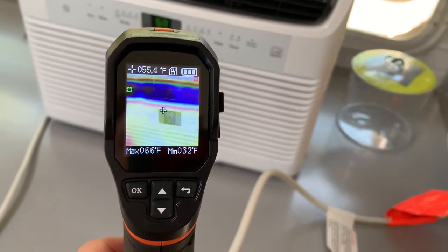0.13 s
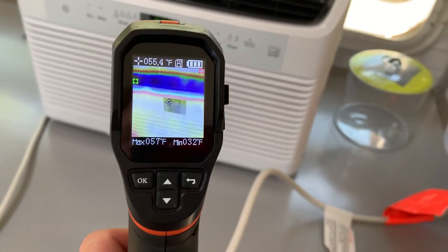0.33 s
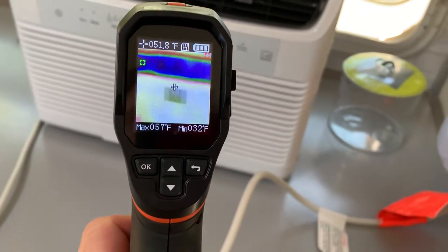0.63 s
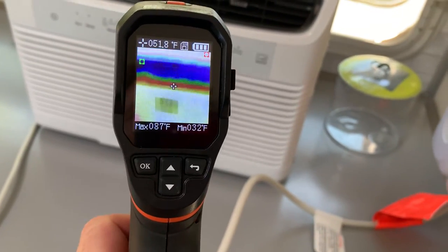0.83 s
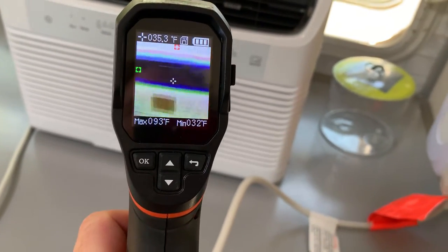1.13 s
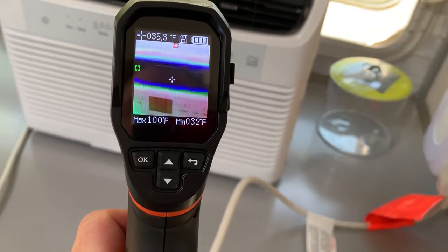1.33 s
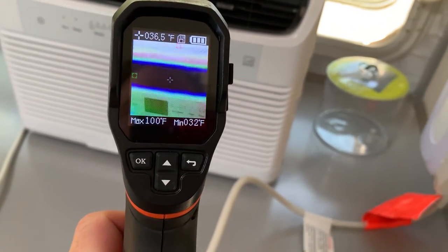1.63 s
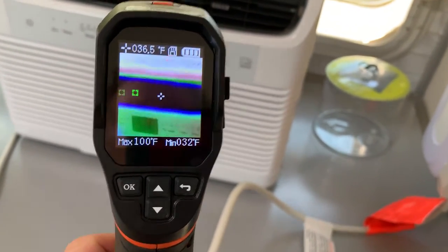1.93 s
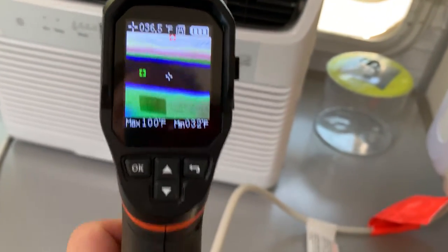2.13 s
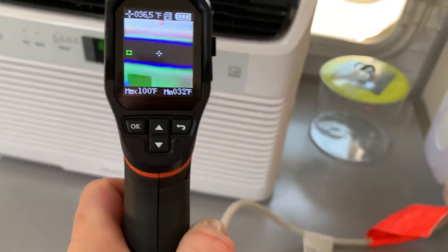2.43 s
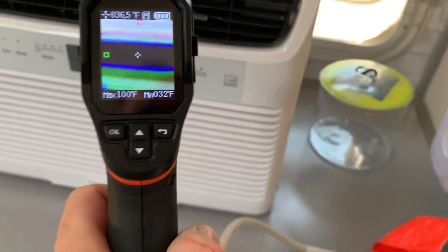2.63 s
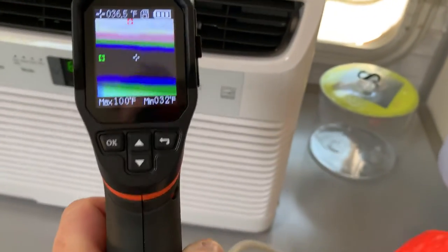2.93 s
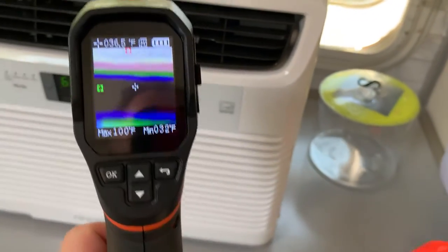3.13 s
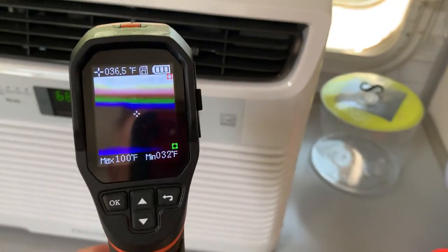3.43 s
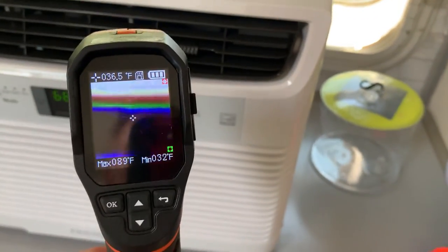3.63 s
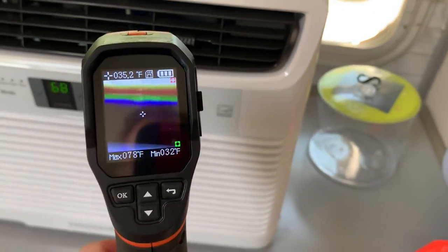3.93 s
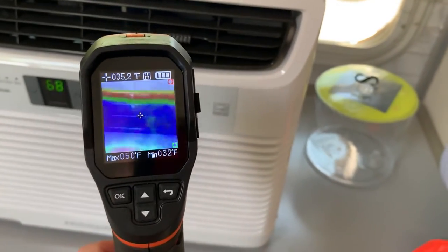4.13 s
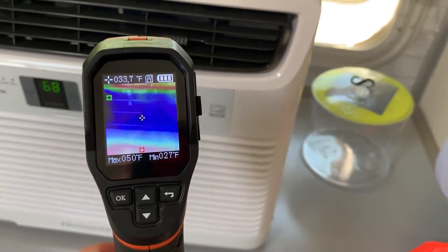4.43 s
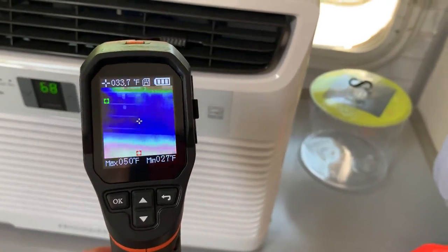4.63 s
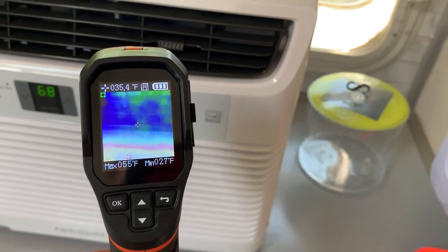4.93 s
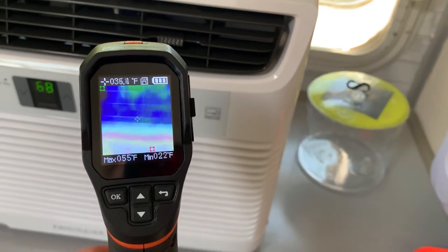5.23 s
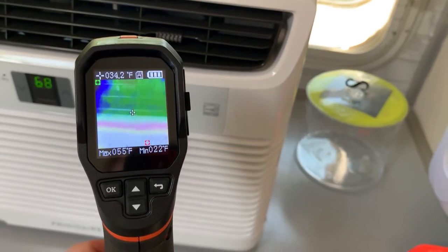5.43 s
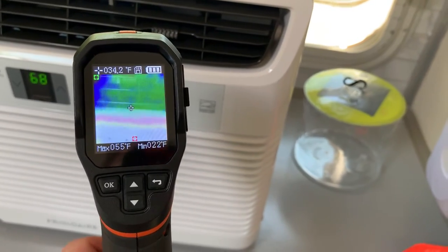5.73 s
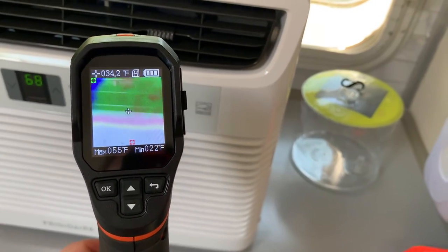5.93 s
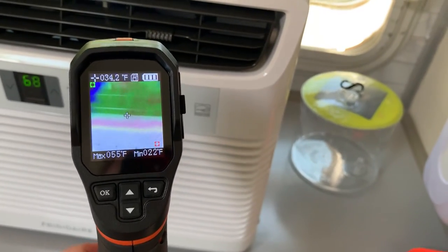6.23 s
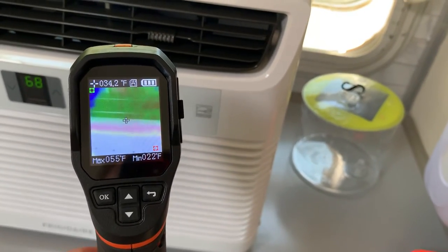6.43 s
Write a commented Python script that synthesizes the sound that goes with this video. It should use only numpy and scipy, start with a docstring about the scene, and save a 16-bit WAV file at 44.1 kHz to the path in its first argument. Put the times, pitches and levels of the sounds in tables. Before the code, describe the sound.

Close to a running air conditioner: low buzzing hum and fan drone under an even rush of air, the tone shifting slightly midway.

```python
"""A window air conditioner runs in a small camper, close to a hand-held camera with two microphone ports.
The compressor hums on many multiples of its shaft speed (sines and a repeated buzz), the fan blades drone
(wavering sines) and air rushes through the louvres (shaped noise); the bass dips slightly until 1.8 s.
From 2.3 to 3.2 s the camera swings, and the standing waves reach the ports differently.
The bass swells until 5 s and then holds; the hiss grows until about 5 s, then eases a little."""
import sys
import numpy as np
from scipy import signal
from scipy.fft import rfft, irfft, next_fast_len
from scipy.io import wavfile
from scipy.ndimage import uniform_filter1d, map_coordinates

SR = 44100
rng = np.random.default_rng(int(sys.argv[2]) if len(sys.argv) > 2 else 0)


def unload_audio(sound):
    """Save the sound as a 16-bit wav file, at the path given as the first command line argument."""
    columns = np.transpose(np.atleast_2d(sound))
    # keep every value between -1 and 1, then stretch to whole-number steps
    steps = np.round(np.clip(columns, -1, 1) * 32767)
    wavfile.write(sys.argv[1], SR, steps.astype(np.int16))


def boost(x):
    """Linear amplitude factor 10**(x/20) for a level x in decibels (scalar or array-like)."""
    u = np.asarray(x, float) / 20
    return 10 ** u


N = 290178  # samples
SHAFT_HZ = 58.02  # compressor turns a second

# Strong compressor tones, before creep and tremor: (multiple of the shaft speed, then rms level [dB] of
# first place in step, first place opposed, second place in step, second place opposed)
SHAFT_TONES = [(1, -32, -49, -31, -48), (2, -49.5, -66, -46, -62), (3, -57, -70, -61, -77),
               (4, -51, -70, -48, -67), (5, -43, -65, -42, -60), (6, -56, -69, -59, -77),
               (7, -60, -71, -66, -73), (13, -60, -70, -63, -75), (14, -62, -61, -69, -62),
               (15, -61, -61, -53, -75), (16, -52, -54, -57, -56), (17, -64, -52, -56, -52),
               (18, -53, -57, -54, -58), (19, -60, -52, -59, -58), (20, -62, -50, -54, -50),
               (21, -53.5, -65, -54, -65), (22, -41.5, -58, -54.5, -48), (23, -54.5, -64, -59, -49),
               (24, -63, -65, -77, -57), (25, -62, -57, -63, -55), (26, -70, -57, -56, -66),
               (27, -56, -61, -57, -51), (28, -67, -58, -52.5, -53), (30, -58.5, -72, -65, -76),
               (31, -64, -74, -65, -65), (36, -70, -66, -67, -74), (37, -67, -67, -66, -76),
               (40, -76, -72, -65, -80), (44, -80, -90, -71, -78), (41, -64, -66, -57, -64),
               (54, -68, -63, -70, -76), (57, -59, -68, -66, -66), (61, -72, -66, -72, -71),
               (86, -72, -79, -85, -85), (148, -90, -76, -90, -69), (179, -70, -90, -74, -90),
               (227, -90, -73, -90, -66), (228, -90, -76, -90, -67)]
# How alike the two ports hear a sound: (frequency [Hz], likeness [0-1])
PORT_LIKENESS = [(60, .99), (380, .95), (520, .3), (650, .3), (800, .7), (1000, .65), (1300, .2),
                 (3000, .3), (4500, .15), (6500, .4), (7600, .86), (16000, .9)]
# Left port over right port for noise of the air: (frequency [Hz], level [dB])
PORT_TILT = [(60, 5), (110, -3.5), (200, 0), (380, 0), (700, -2), (1290, 1), (2380, -0.5), (4400, -4),
             (8120, 0), (15000, -0.5)]


def along(points, hz):
    """Reads a value between (frequency [Hz], value) points on a log frequency axis."""
    f, v = np.transpose(points)
    return np.interp(np.log(hz + 1), np.log(f + 1), v)


def wobble(rate):
    """A smooth random curve through `rate` random points a second."""
    at = np.arange(0, N + 128, 128)
    points = rng.standard_normal(int(N * rate / SR) + 4)
    return np.interp(np.arange(N), at, map_coordinates(points, [at * rate / SR]))


def patch_field(shape, bins, frames):
    """Random gain patches over frequency and time, with a spread of one."""
    field = uniform_filter1d(rng.standard_normal(shape), size=bins, axis=0)
    field = uniform_filter1d(field, size=frames, axis=1)
    return field / field.std()


def patched(x, patchy_db, bins, frames):
    """Gives x random gain patches, as a trembling hand moves through short standing waves."""
    z = signal.stft(x, nperseg=1024)[2]
    z = z * boost(patchy_db * patch_field(z.shape[1:], bins, frames))
    return signal.istft(z, nperseg=1024)[1][:, :N]


def hand():
    """The hand's motion: place (0 first, 1 second), arrival clock [s], bass and hiss gains [dB]."""
    # The hand drifts toward the machine and back: (time [s], distance [m])
    hand_distance = [(0, 0.86), (1.3, 0.79), (2, .75), (3, 0.72), (4.6, .69), (5.1, 0.68), (6.58, 0.79)]
    # The cabin's bass swells as the camera nears the wall: (time [s], level [dB])
    bass_swell = [(0, -0.4), (1.8, -0.74), (3.2, 0), (5, 0.47), (6.58, 0.43)]
    swing_start_s, swing_end_s = 2.33, 3.22
    hiss_first_db, hiss_second_db = -0.5, 0.55  # at the two places
    sound_m_per_s = 343
    t = np.arange(N) / SR
    metres = np.interp(t, *np.transpose(hand_distance))
    metres = uniform_filter1d(metres, size=SR // 3, mode="nearest")
    near_db = 20 * np.log10(metres[0] / metres)
    swing = np.clip((t - swing_start_s) / (swing_end_s - swing_start_s), 0, 1)
    place = np.sin(swing * np.pi / 2) ** 2
    clock = t - metres / sound_m_per_s
    bass_db = np.interp(t, *np.transpose(bass_swell))
    # the hiss grows less than 1 / distance would make it
    hiss_db = hiss_first_db + (hiss_second_db - hiss_first_db) * place + 0.31 * near_db
    return place, clock, bass_db, hiss_db


def crossing_lead(hz):
    """Radians by which the left port leads for sound that crosses from one port to the other."""
    lag_samples, in_step_hz = 8.95, 10940
    return 2 * np.pi * (hz - in_step_hz) * lag_samples / SR


def low_air_lead(hz):
    """Radians by which the left port leads for the boom and the duct."""
    # Lead of the left port: (frequency [Hz], lead [radians])
    left_lead = [(60, 0.49), (400, -0.24), (600, -2.2), (900, 1), (1200, -2.5)]
    return along(left_lead, hz)


def shaft_wave():
    """A cosine that runs once for each compressor stroke."""
    return np.cos(2 * np.pi * SHAFT_HZ * np.arange(N) / SR)


def air(spectrum, lead, patchy_db):
    """Moving air: stereo noise at the given density, partly alike at both ports, with patches of random gain."""
    z = signal.stft(rng.standard_normal((2, N + 512)), nperseg=512)[2]
    gain = boost(patchy_db * patch_field(z.shape[1:], bins=5, frames=10))
    pair = signal.istft(z * gain, nperseg=512)[1]
    m = next_fast_len(N + 8192)
    hz = np.fft.rfftfreq(m, 1 / SR)
    density = boost(along(spectrum, hz)) * (hz < spectrum[-1][0]) * np.sqrt(SR / 2)
    a, b = rfft(pair, m) * density
    # this angle blends two noises so that the ports are as alike as the table says
    turn = np.arccos(np.clip(along(PORT_LIKENESS, hz), 0, 1)) / 2
    half = np.exp(.5j * lead(hz)) * boost(along(PORT_TILT, hz) / 2)
    left = (np.cos(turn) * a + np.sin(turn) * b) * half
    right = (np.cos(turn) * a - np.sin(turn) * b) / half
    return irfft(np.array([left, right]), m)[:, :N]


def windings():
    """The motor windings give a faint steady hum at twice the mains frequency."""
    return np.sqrt(2) * boost(-53) * np.sin(2 * np.pi * 120 * np.arange(N) / SR)


def boom(bass_db):
    """Air in the housing and the cabin makes a low boom that follows the bass swell."""
    # Boom before the bass swell: (frequency [Hz], density [dB per Hz])
    boom_spectrum = [(25, -88), (34, -80), (42, -75), (55, -60), (70, -54), (100, -61.5), (200, -61),
                     (260, -62), (340, -59.5), (410, -72), (480, -82.5), (700, -89)]
    return boost(bass_db) * air(boom_spectrum, low_air_lead, patchy_db=0.68)


def duct(place, bass_db):
    """Turbulence keeps the air columns in the duct sounding: narrow humps of noise."""
    # Air columns, at the second place before the bass swell:
    # (centre [Hz], width at a quarter of the power [Hz], peak density [dB per Hz])
    air_columns = [(620, 15, -80), (750, 30, -72), (887.5, 32, -67), (1057, 29, -65.5), (1840, 34, -76.5)]
    hz = np.arange(400, 2200, 4.)
    power = sum(boost(2 * db) / (1 + (2 * (hz - centre_hz) / width_hz) ** 2) ** 2
                for centre_hz, width_hz, db in air_columns)
    humps = list(zip(hz, 10 * np.log10(power)))
    return boost(bass_db - 2.5 * (1 - place)) * air(humps, low_air_lead, patchy_db=2)


def hiss(hiss_db):
    """Air and gas hiss finely, pulsing at the stroke rate and at twice that rate."""
    # Hiss before its pulses and gain: (frequency [Hz], density [dB per Hz])
    hiss_spectrum = [(3000, -100), (4500, -98), (6000, -92), (7500, -91), (7850, -90), (8600, -96.5),
                     (9200, -95.5), (10100, -88.5), (11000, -93), (12000, -90), (13100, -93), (13700, -89),
                     (14500, -88.5), (16000, -92)]
    stroke = shaft_wave()
    pulse_db = 0.72 * stroke + .5 * (2 * stroke ** 2 - 3.5)  # the square runs at twice the rate
    return boost(hiss_db + pulse_db + 0.52 * wobble(12)) * air(hiss_spectrum, crossing_lead, patchy_db=1.56)


def louvres(place):
    """Air rushes lumpily through the louvres; the cabin walls colour it differently at the two places."""
    # Rush before its faint stroke pulse, random sway and patches: (frequency [Hz], then density [dB per Hz] of
    # first place in step, first place opposed, second place in step, second place opposed)
    rush_spectrum = [(297, -75, -88, -79, -85.0), (410, -67, -82, -72, -83),
                     (470.0, -76.5, -86, -73.5, -79), (565, -73, -77.0, -71.5, -74.5),
                     (653, -77, -76, -75.5, -76.0), (770, -72.0, -77, -71.5, -78),
                     (970, -74.5, -77.0, -75, -74.5), (1110, -78, -75, -78, -77.0),
                     (1180, -76.5, -78.0, -73, -80), (1390, -76, -82.0, -81, -73),
                     (1520, -79.5, -80, -78.5, -76.0), (1630, -77.5, -79.0, -75, -77.0),
                     (1630, -81.0, -79, -81.5, -74), (1780, -81, -81, -80, -77),
                     (2010, -85.5, -81, -85, -84.0), (2110, -80.5, -81.0, -82.5, -85),
                     (2300, -87.5, -86.0, -82.5, -87.0), (2410, -85.5, -86.0, -83.0, -83.0),
                     (2510, -89.0, -88, -88, -82.0), (2720, -91.5, -84, -87.5, -84.0),
                     (3100, -85.5, -88, -85, -86), (3400, -86.5, -88.0, -87.5, -88),
                     (3420.0, -90.5, -86, -86.5, -87.0), (3670, -88.0, -91, -86.5, -89.0),
                     (3810, -89.0, -98, -87.5, -97), (4270, -93, -90, -90.5, -89),
                     (6000.0, -102.0, -102.0, -102.0, -102.0)]
    pair = patched(rng.standard_normal((2, N + 1024)), patchy_db=1.92, bins=5, frames=5)
    m = next_fast_len(N + 8192)
    hz = np.fft.rfftfreq(m, 1 / SR)
    a, b = rfft(pair, m) * (hz < rush_spectrum[-1][0]) * np.sqrt(SR / 2)
    tied = np.clip(along(PORT_LIKENESS, hz), 0, 1)
    # the tied share of the opposed part runs a quarter cycle apart
    across = 1j * tied * a + np.sqrt(1 - tied ** 2) * b
    points, *columns = np.transpose(rush_spectrum)
    gains = [boost(along(np.transpose([points, db]), hz)) for db in columns]
    tilt = boost(along(PORT_TILT, hz) / 2)
    places = []
    for in_step, opposed in (gains[:2], gains[2:]):
        left = (in_step * a + opposed * across) * tilt
        right = (in_step * a - opposed * across) / tilt
        places.append(irfft(np.array([left, right]), m)[:, :N])
    first, second = places
    pulse_and_sway = boost(0.1 * shaft_wave() + 0.24 * wobble(2.97))
    return pulse_and_sway * ((1 - place) * first + place * second)


def fan(bass_db):
    """The fan blades drone as they pass; the tone wavers in level with the turbulent inflow."""
    # Blade tones before swell and waver: (multiple of the blade rate, rms level [dB], waver [dB])
    blade_tones = [(1, -30.5, 0.7), (2, -44.5, -0.5)]
    blade_hz = 82.575  # blades passing a second
    t, out = np.arange(N) / SR, np.zeros((2, N))
    for k, db, waver_db in blade_tones:
        phase = 2 * np.pi * k * blade_hz * t + k * 0.069 * wobble(3.9)
        ports = np.sin(phase + np.array([[-.11], [.11]])) * boost(np.array([[.4], [-.4]]))
        level_db = db + 3.4 * bass_db + waver_db * wobble(7.7)  # swells more than the boom
        out += np.sqrt(2) * boost(level_db) * ports
    return out


def buzz(place, clock):
    """The casing buzzes: one stroke repeats, each multiple having a chance strength at each place."""
    # Weak comb of shaft multiples before chance scatter: (frequency [Hz], rms level of one line [dB])
    buzz_lines = [(300, -75), (760, -72), (1800, -72), (2400, -74), (3300, -73), (4100, -77), (4600, -85),
                  (5200, -83), (7300, -79), (8000, -85), (8600, -77), (9200, -83), (10100, -76),
                  (11000, -82), (13200, -77), (13800, -84), (15700, -81)]
    k, size = np.arange(300), 2 ** 14
    hz = k * SHAFT_HZ
    strong = np.isin(k, np.round([row[0] for row in SHAFT_TONES]))
    free = (k > 5) & (hz < buzz_lines[-1][0]) & ~strong
    scatter_db = 2.5 * rng.standard_normal((2, 1, len(k)))
    lines = free * boost(along(buzz_lines, hz) + scatter_db)
    phase = 1.26 * rng.standard_normal((2, 1, len(k))) + np.multiply.outer([.5, -.5], crossing_lead(hz))
    # less alike ports get more random phase
    spread = np.sqrt(-np.log(np.clip(along(PORT_LIKENESS, hz), .01, 1)))
    phase += spread * rng.standard_normal((2, 2, len(k)))
    stroke = irfft(lines * np.exp(1j * phase), size) * size / np.sqrt(2)
    at = (clock * SHAFT_HZ % 1) * size  # where in the stroke each moment falls
    first, second = [[np.interp(at, np.arange(size), port, period=size) for port in spot] for spot in stroke]
    both = np.sqrt(1 - place) * first + np.sqrt(place) * second
    return patched(both, patchy_db=3, bins=3, frames=40)


def compressor(place, clock):
    """The shaft hums in sines, each with a part in step at both ports and a part opposed, a quarter cycle apart."""
    # Multiples that change early (below 0) or late in the swing, as the ports leave or enter a crest:
    # multiple: delay [s]
    crest_delay = {16: .2, 20: .2, 22: -.03, 23: .05, 27: -.45, 28: -.4, 30: -.2, 41: -.48, 57: -.12}
    # Multiples that creep as the hand drifts: multiple: (first place [dB a second], second [dB a second])
    level_creep = {22: (-.2, 2), 23: (4, -1.2), 24: (2, 0), 26: (0, 1.3), 27: (0, -1.5), 28: (0, -.5),
                   41: (2.5, 1.4), 57: (-1, -.5)}
    # Multiples whose part in step passes through silence during the swing
    through_a_node = (21, 27, 30, 41, 57)
    turns, out, t = 2 * np.pi * SHAFT_HZ * clock, np.zeros((2, N)), np.arange(N) / SR
    for k, *db in SHAFT_TONES:
        step_first, opposed_first, step_second, opposed_second = boost(np.array(db))
        early, late = level_creep.get(k, (0, 0))
        step_first = step_first * boost(early * (np.minimum(t, 2.4) - 1.1))
        step_second = step_second * boost(late * (np.maximum(t, 3) - 4.8))
        step_second *= -1 if k in through_a_node else 1
        here = np.interp(t - crest_delay.get(k, 0), t, place)
        in_step = step_first + (step_second - step_first) * here
        opposed = opposed_first + (opposed_second - opposed_first) * here
        # nearly aligned tones throb once a stroke
        phase = k * turns + .25 * rng.standard_normal() + .005 * k * wobble(4)
        way = -1 if k < 8 else rng.choice([-1, 1])  # which port leads
        mid = in_step * np.sin(phase)
        side = way * opposed * np.cos(phase)
        if k > 1:
            # a standing wave is steady at its crest and shifts with every tremor of the hand away from it
            below_crest_db = max(db) - 20 * np.log10(abs(in_step) + 1e-5)
            tremor_db = np.clip((.5 if k == 22 else 1.1) + .2 * below_crest_db, 0, 2.5)
            mid = mid * boost(tremor_db * wobble(5))
            side = side * boost(1.2 * wobble(2))
        out += np.sqrt(2) * np.array([mid + side, mid - side]) * boost(np.array([[.4], [-.4]]))
    return out


def scene():
    """All parts of the machine, added up at the two ports."""
    place, clock, bass_db, hiss_db = hand()
    airflow = boom(bass_db) + duct(place, bass_db) + hiss(hiss_db) + louvres(place)
    return windings() + airflow + fan(bass_db) + buzz(place, clock) + compressor(place, clock)


def weaker_dropped(stereo, margins_db):
    """In each treble band and frame, mutes the ports' sum or difference when it is clearly the weaker."""
    z = signal.stft(np.array([stereo[0] + stereo[1], stereo[0] - stereo[1]]) / 2, nperseg=2048)[2]
    low, high, width = 352, 736, 32  # bins of 21.5 Hz
    power = (abs(z[:, low:high]) ** 2).reshape(2, -1, width, z.shape[2]).sum(axis=2)
    limit = power[::-1] * boost(-2 * np.reshape(margins_db, (2, 1, 1)))
    z[:, low:high] *= np.repeat(power > limit, width, axis=1)
    z[:, high - 5:] = 0  # nothing above about 15.7 kHz
    mid, side = signal.istft(z, nperseg=2048)[1][:, :N]
    return np.array([mid + side, mid - side])


def roll_off(x):
    """The treble ends steeply here."""
    return signal.sosfilt(signal.butter(12, 17040, fs=SR, output="sos"), x)


def record(dry):
    """The camera takes the sound at its two ports as a stereo pair."""
    return roll_off(dry)


dry = scene()
out = record(dry)
unload_audio(out)
```